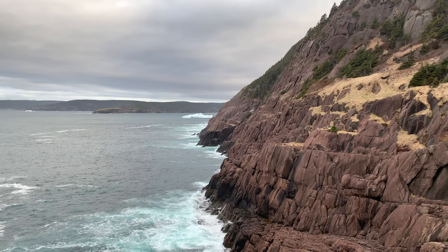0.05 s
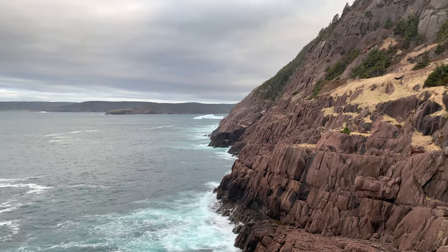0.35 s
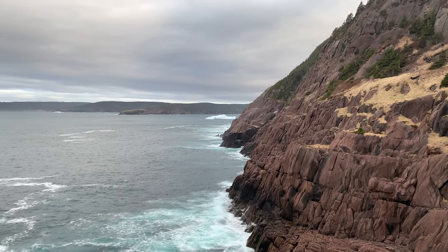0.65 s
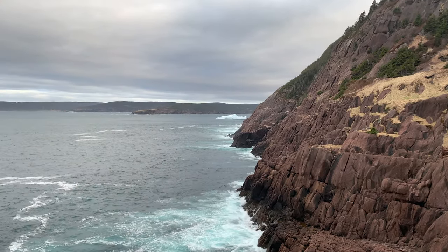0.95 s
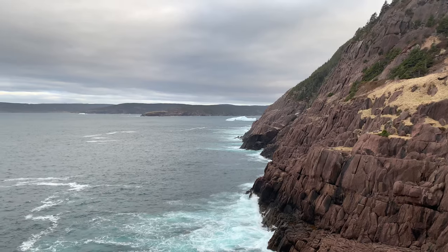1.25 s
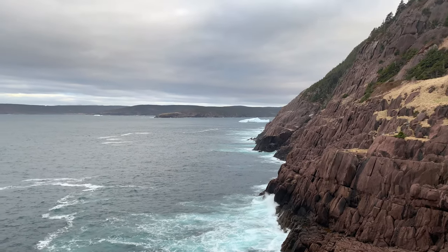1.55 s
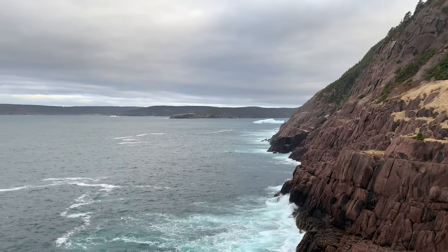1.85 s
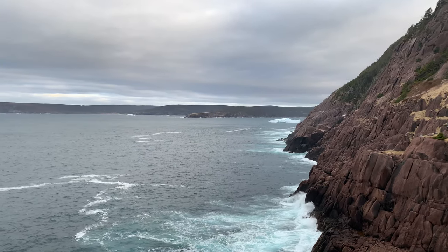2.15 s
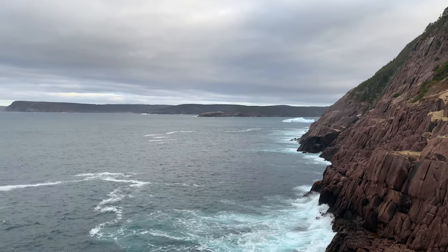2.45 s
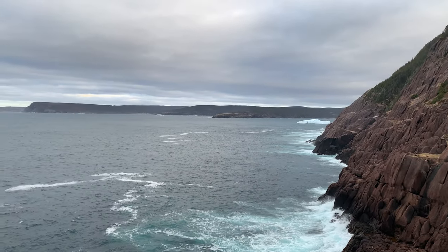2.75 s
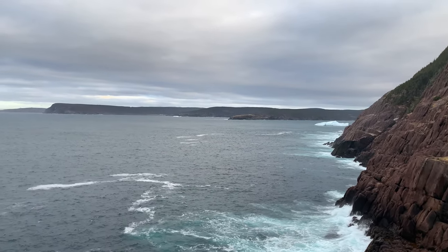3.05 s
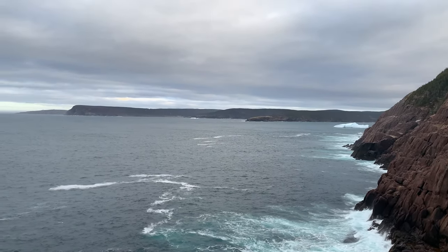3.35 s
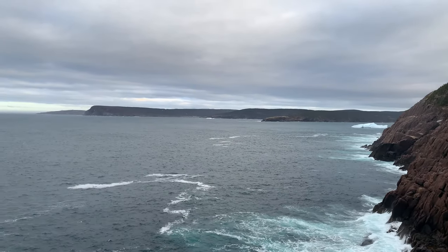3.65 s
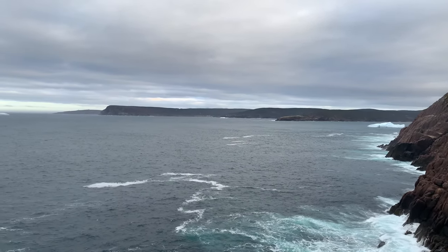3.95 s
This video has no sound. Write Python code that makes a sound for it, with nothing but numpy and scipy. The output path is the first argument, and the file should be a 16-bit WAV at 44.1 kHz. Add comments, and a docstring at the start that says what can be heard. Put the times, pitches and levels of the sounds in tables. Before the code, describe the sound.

Sea surf rushes continuously at the foot of a rocky cliff, heard from above, while wind gusts rumble on the microphone. A larger wave breaks past the middle, then the wind eases and smaller waves hiss with foam.

```python
"""Sea surf at the foot of a rocky cliff, heard from high above on a hand-held phone.
From the start, gusts rumble on the microphones while white water churns and waves wash over the rocks.
Around 2.5 s the largest wave breaks over the rumble of heavy swell; the phone swings seaward.
The wind eases and smaller waves follow, their foam hissing on as a dense cloud of bursting bubbles."""
import sys
import numpy as np
from scipy import signal
from scipy.fft import rfft, irfft
from scipy.io import wavfile
from scipy.ndimage import uniform_filter1d

SR = 44100
rng = np.random.default_rng(int(sys.argv[2]) if len(sys.argv) > 2 else 0)


def digitize_waveform(pressure):
    """Quantize a signal to 16-bit integers and store it at the path in sys.argv[1].

    Rows of a 2-D input are taken as channels; values are limited to [-1, 1].
    """
    field = np.atleast_2d(pressure).T
    bounded = np.clip(field, -1, 1)
    quanta = np.round(bounded * 32767).astype(np.int16)
    wavfile.write(sys.argv[1], SR, quanta)


N = 176400

# waves over the ledges: crest_s, rise_s, fall_s, churn_db, wash_db, foam_db, hiss_db, spray_db
WAVES = [(.2, 0.26, 0.16, -35, -38.5, -37.5, -39.7, -42), (.55, 0.13, 0.12, -41, -38, -41.5, -43, -45),
         (.96, 0.32, 0.54, -35.5, -46, -53, -60, -61), (1.38, 0.092, 0.11, -35, -47, -42, -45.5, -54),
         (1.73, 0.15, 0.19, -34.5, -45, -43, -45, -48.5), (2.12, 0.24, .15, -37.5, -36, -41, -39.5, -43),
         (2.35, 0.16, 0.23, -32.5, -32, -39.5, -37.5, -42),
         (2.5, 0.15, 0.23, -36.5, -35.5, -37.5, -34.5, -37.5),
         (2.77, 0.083, 0.31, -38.5, -38.5, -43, -40, -39.5), (3.38, 0.24, 0.15, -42, -44, -44.5, -44, -44),
         (3.78, .14, 0.43, -39, -49, -59, -55, -54)]
# swells of the low end: crest_s, half_length_s, level_db
ROCK_SURGES = [(0.423, .06, -36.5), (0.73, 0.075, -29), (0.843, 0.044, -38), (1.254, 0.3, -36.5),
               (1.868, 0.17, -32.5), (2.04, 0.075, -31.5), (2.22, 0.1, -37), (2.39, 0.14, -33),
               (2.72, .17, -36.5), (2.963, .06, -34.5), (3.245, 0.12, -33.5), (3.61, 0.056, -31),
               (3.87, 0.14, -34)]
HOLLOW_SWELLS = [(1.05, .06, -38), (2.25, 0.15, -40.5), (2.59, 0.05, -32.5), (2.8, 0.056, -32.5),
                 (3.28, .12, -39.5), (3.57, 0.092, -35.5), (3.8, 0.074, -36)]  # slight swells in the surf's hollow low rumble near 300 Hz
WIND_GUSTS = [(0.05, 0.063, -29), (0.206, 0.065, -32), (0.417, 0.044, -29), (0.67, 0.042, -26.5),
              (0.8, 0.11, -30.5), (1.033, 0.037, -28.5), (1.333, 0.12, -30.5), (1.647, 0.085, -27.5),
              (1.824, .05, -30), (2.016, 0.06, -30.5), (2.156, 0.048, -31.5), (2.367, 0.098, -31),
              (2.773, .04, -43), (3.174, 0.063, -33.5), (3.6, 0.087, -37), (3.746, 0.096, -34.5),
              (3.888, .07, -33)]
# tone colour of each layer of water and wind: frequency_hz, gain_db
CHURN_EQ = [(200, -5.5), (370, -4.5), (520, -0.5), (680, -3), (830, -4), (1050, -10.5), (1700, -35),
            (5000, -74)]
WASH_EQ = [(500, -20), (850, -3), (1300, 0.5), (1550, -2.5), (1800, -1.5), (2000, -5.5), (2250, -2.5),
           (2650, -14.5), (4000, -18), (9000, -46)]
FOAM_EQ = [(1200, -15), (1900, 3), (2350, 1), (2720, 1.5), (3080, 2), (3450, 0), (4000, -6), (5500, -19),
           (9000, -50)]
HISS_EQ = [(2900, -32), (3500, -5.5), (4000, 0), (4350, -2), (4700, -0.5), (5000, -3), (5400, -1),
           (6200, -6.5), (7500, -7.5), (14000, -58)]
SPRAY_EQ = [(3500, -30), (6200, -5.5), (7400, -.3), (8400, .2), (9300, -1.5), (10000, -4), (11000, -7),
            (12000, -10.5), (13000, -14.5), (14000, -19.5), (15500, -29)]
SURGE_EQ = [(60, -38), (110, -1), (155, -0.5), (210, -0.5), (260, -3), (330, -7.5), (500, -19), (1200, -63)]
HOLLOW_EQ = [(170, -33), (250, -3.5), (305, 3), (350, -4), (410, -12), (600, -37.5)]
WIND_EQ = [(12, -20), (25, -8.5), (40, -3), (60, 1), (105, -3), (150, -11), (260, -35.5), (600, -64)]
# flicker as bubble patches come and go, gentlest in the fizz: frequency_hz, spread_db
FLICKER_DEPTH = [(400, 0.9), (2000, 0.8), (4500, 0.5), (9000, 0.35)]
# the phone's turn from cliff to open sea: time_s, seaward_fraction
SEAWARD_TURN = [(0, 0), (1.5, 0.2), (2.6, 0.27), (3.1, 0.84), (4, 1)]
# stereo image at either end of the turn: frequency_hz, likeness_fraction, left_lead_rad
CLIFF_IMAGE = [(60, .95, 0), (350, .935, .15), (750, .85, .15), (1100, .7, .15), (1420, .25, .2),
               (1600, .5, -2.1), (1820, .38, -.8), (2020, .25, -1.8), (2280, .48, .4), (2520, .27, 2),
               (2700, .3, 4.3), (2880, .56, 6.1), (3100, .62, 7.3), (3280, .3, 8), (3650, .35, 7.5),
               (4200, .3, 6.7), (4420, .4, 6.1), (4620, .64, 6.8), (4950, .27, 8), (5200, .3, 9.3),
               (5420, .52, 10.3), (6000, .42, 10.3), (6350, .2, 12.8), (6550, .5, 14), (6800, .6, 14.3),
               (7800, .92, 14.3), (8800, .84, 14.3), (12000, .88, 14.3)]
SEA_IMAGE = [(60, .95, 0), (350, .935, -.1), (750, .8, -.4), (1100, .78, -.4), (1350, .64, -1.1),
             (1640, .88, -1.7), (1900, .58, -1.1), (2120, .35, -1.7), (2400, .15, 1.2), (2620, .5, 3.5),
             (2800, .33, 4.5), (2950, .1, 2.4), (3250, .25, 2.9), (3550, .18, 3.3), (3900, .42, 5.7),
             (4200, .6, 6.4), (4700, .48, 7), (5000, .3, 8.6), (5200, .45, 9.9), (5420, .62, 10.9),
             (5800, .42, 10.4), (6100, .15, 9.3), (6500, .35, 7.4), (6800, .4, 7.6), (7800, .9, 7.6),
             (8800, .84, 7.6), (12000, .88, 7.6)]
# lean of the stereo image: frequency_hz, left_minus_right_db
STEREO_BALANCE = [(60, .5), (200, 0.5), (380, 0.2), (700, 2), (1300, 3.5), (2000, 2.5), (2500, 2.5),
                  (4300, 1), (5100, 0), (5950, -3.5), (7200, 0.5), (9000, -0.5)]
# colour shift over the turn: frequency_hz, end_minus_start_db
TURN_EQ = [(90, 4), (130, 3), (200, -3), (350, 2.5), (520, .5), (750, 1.5), (1200, 1.5), (1500, 5.5),
           (2000, -1), (2400, 2), (2850, -2.5), (3400, 1.5), (4200, 1.5), (5200, 3), (6200, -2),
           (8000, 2.5), (11000, -1.5)]

# steady bed of each layer between swells
CHURN_DB, WASH_DB, FOAM_DB, HISS_DB, SPRAY_DB = -35, -37, -42, -43.5, -49.5
SURGE_DB, HOLLOW_DB, WIND_DB = -36, -40.5, -36.5
BUBBLES_PER_S, BUBBLE_SPREAD_DB, BUBBLE_SHARE = 9000, 3.0, 0.19
DROPS_PER_S, DROP_SHARE = 3300, .12
PATCHES_PER_S = 20
BREAK_S, BREAK_HALF_S, BREAK_FOCUS = 2.63, .45, 0.59
TREBLE_FROM_HZ, TREBLE_LAG_S = 6800, .000252


def white_water():
    """The body of the surf: clouds of large bubbles churn below as each wave washes over the ledges."""
    churn = stereo_layer(turbulence, CHURN_EQ) * wave_fader(CHURN_DB, column=3)
    wash = stereo_layer(bubbles, WASH_EQ) * wave_fader(WASH_DB, column=4)
    return churn * pan(.4, -0.43) + wash * pan(0.55, -.6)


def foam():
    """The top end: foam fizzes on the rocks, thin sheets of water hiss and fine spray patters back."""
    fizz = stereo_layer(bubbles, FOAM_EQ) * wave_fader(FOAM_DB, column=5)
    hiss = stereo_layer(bubbles, HISS_EQ) * wave_fader(HISS_DB, column=6)
    spray = stereo_layer(drops, SPRAY_EQ) * wave_fader(SPRAY_DB, column=7)
    return (fizz + hiss) * pan(-1.3, 1.2) + spray


def bubbles():
    """Countless tiny bursts, a few larger than the rest, merge into a hiss."""
    bursts = (rng.random(N) < BUBBLES_PER_S / SR) * np.sign(turbulence())
    size = undb(BUBBLE_SPREAD_DB * np.minimum(rng.exponential(size=N), 2 * np.pi))
    return np.sqrt(BUBBLE_SHARE) * unit(bursts * size) + np.sqrt(1 - BUBBLE_SHARE) * turbulence()


def drops():
    """Separate droplets tick through the hiss of the bubbles."""
    ticks = (rng.random(N) < DROPS_PER_S / SR) * turbulence()
    return np.sqrt(DROP_SHARE) * unit(ticks) + np.sqrt(1 - DROP_SHARE) * bubbles()


def bubble_patches(surf):
    """Patches of bubbles of one size come and go, so every quarter octave flickers on its own."""
    spectrum, flickering = faded_spectrum(surf), 0
    centres_hz = 400 * 2 ** (np.arange(21) / 4)
    for hz in centres_hz:
        band = irfft(spectrum * np.interp(bin_hz(), centres_hz, 1. * (centres_hz == hz)), N)
        spread_db = np.interp(hz, *np.array(FLICKER_DEPTH).T)
        flickering = flickering + band * undb(spread_db * wander(PATCHES_PER_S))
    return flickering


def heavy_swell():
    """The weight under the surf: water surges against the rock, and a hollow rumble swells slightly."""
    return rumble(SURGE_EQ, SURGE_DB, ROCK_SURGES) + rumble(HOLLOW_EQ, HOLLOW_DB, HOLLOW_SWELLS)


def wind():
    """Gusts buffet the microphones with a deep rumble."""
    return rumble(WIND_EQ, WIND_DB, WIND_GUSTS)


def rumble(eq, bed_db, swells):
    """Low turbulence, levelled to an even roll, then pushed up in symmetrical swells."""
    roll = stereo_layer(turbulence, eq)
    power = uniform_filter1d(np.mean(roll ** 2, axis=0), int(.16 * SR))
    return roll / np.sqrt(power) * fader(bed_db, [(s, half, half, db) for s, half, db in swells])


def turbulence():
    """Random pressure: white noise."""
    return rng.standard_normal(N)


def wave_fader(bed_db, column):
    """Gain of one surf layer, riding the waves at the levels in its column."""
    return fader(bed_db, np.array(WAVES)[:, [0, 1, 2, column]])


def fader(bed_db, swells):
    """Gain of a steady bed plus bell-shaped swells, added in power."""
    t = np.arange(N) / SR
    power = undb(bed_db) ** 2
    for crest_s, rise_s, fall_s, level_db in swells:
        width_s = np.where(t < crest_s, rise_s, fall_s)
        power = power + undb(level_db) ** 2 * np.exp(-((t - crest_s) / width_s) ** 2)
    return np.sqrt(power)


def stereo_layer(texture, eq):
    """A texture spread wide and coloured, as the two turning microphones hear it; rms 1."""
    hz, t, (right, unrelated) = signal.stft(np.array([texture(), texture()]), SR, nperseg=1024)
    seaward = np.interp(t, *np.array(SEAWARD_TURN).T)
    alike = (1 - seaward) * likeness(CLIFF_IMAGE, hz) + seaward * likeness(SEA_IMAGE, hz)
    # the largest wave breaks in one spot, so both microphones hear it more alike
    focus = BREAK_FOCUS * np.exp(-((t - BREAK_S) / BREAK_HALF_S) ** 2)
    alike = alike / np.abs(alike) ** focus
    left = alike * right + np.sqrt(np.maximum(1 - np.abs(alike) ** 2, 0)) * unrelated
    pair = signal.istft(np.array([left, right]))[1][:, :N]
    balance = undb(np.array([[1], [-1]]) * eq_curve(STEREO_BALANCE) / 2)
    return unit(irfft(rfft(pair) * balance * undb(eq_curve(eq)), N))


def likeness(image, hz):
    """Complex coherence of the microphones; in the treble the left one simply hears the surf late."""
    points_hz, alike, lead_rad = np.array(image).T
    treble_rad = -2 * np.pi * hz * TREBLE_LAG_S
    phase = np.where(hz < TREBLE_FROM_HZ, np.interp(hz, points_hz, lead_rad), treble_rad)
    return (np.interp(hz, points_hz, alike) * np.exp(1j * phase))[:, None]


def pan(start_db, end_db):
    """Stereo gains for a slow drift, left minus right, as the phone turns from the cliff."""
    pan_db = np.linspace(start_db, end_db, N)
    return undb(np.array([pan_db, -pan_db]) / 2)


def wander(steps_per_s):
    """Slow modulation: random steps, smoothed twice; rms 1."""
    hold = int(SR / steps_per_s)
    steps = rng.standard_normal(N)[np.arange(N) // hold]
    return unit(uniform_filter1d(uniform_filter1d(steps, hold), hold))


def faded_spectrum(sound, fade_s=.004):
    """Spectrum of a sound with a short fade at each end."""
    return rfft(sound * signal.windows.tukey(N, 2 * fade_s * SR / N))


def eq_curve(points):
    """Decibels at every bin, joining the points over log frequency."""
    hz, db = np.array(points).T
    return np.interp(np.log(bin_hz()), np.log(hz), db)


def bin_hz():
    """Frequency of every spectral bin, at least 1 Hz."""
    return np.maximum(np.arange(N // 2 + 1) * SR / N, 1)


def undb(db):
    """Decibels to gain."""
    return 10 ** (np.asarray(db) / 20)


def unit(x):
    """Scale to rms 1."""
    return x / np.sqrt(np.mean(x ** 2))


def scene():
    """The full mix, from rumble to spray, crossfading between two colours as the phone turns."""
    mix = faded_spectrum(wind() + heavy_swell() + bubble_patches(white_water() + foam()))
    shift = undb(eq_curve(TURN_EQ) / 2)
    crossfade = np.linspace(0, 1, N)
    return (1 - crossfade) * irfft(mix / shift, N) + crossfade * irfft(mix * shift, N)


def record(dry):
    """The phone cuts the top steeply above 15.2 kHz."""
    return signal.sosfilt(signal.ellip(10, .1, 80, 15200, fs=SR, output="sos"), dry)


dry = scene()
out = record(dry)
digitize_waveform(out)
```